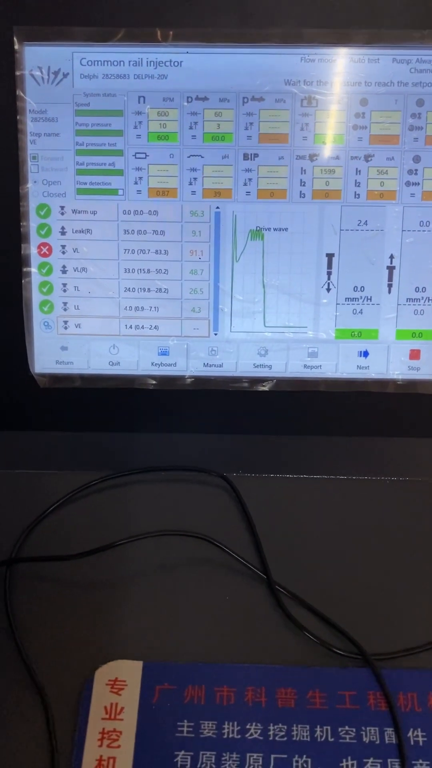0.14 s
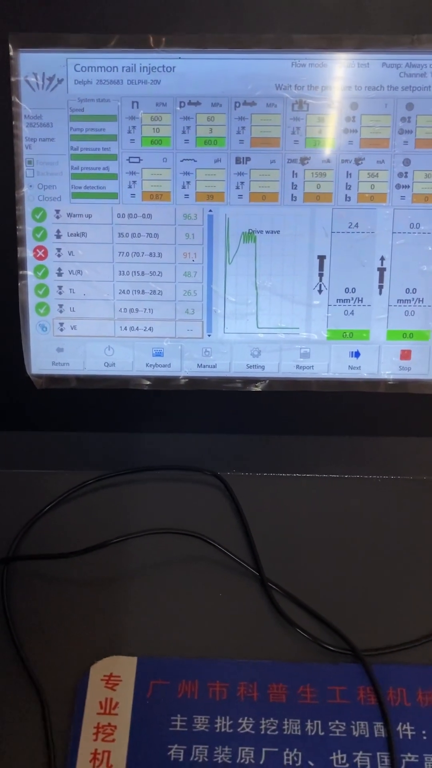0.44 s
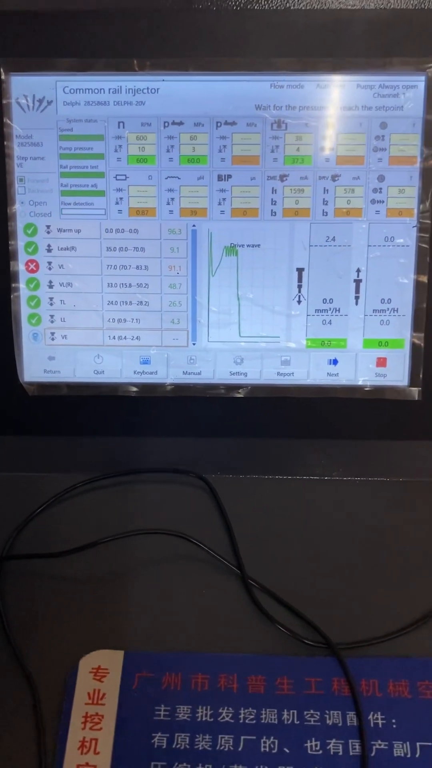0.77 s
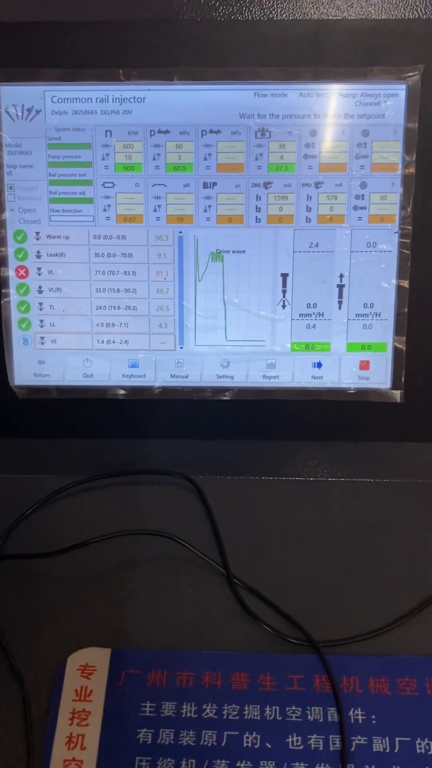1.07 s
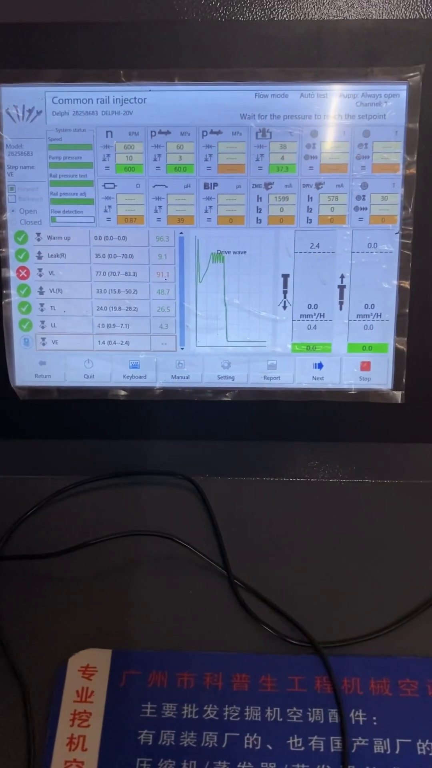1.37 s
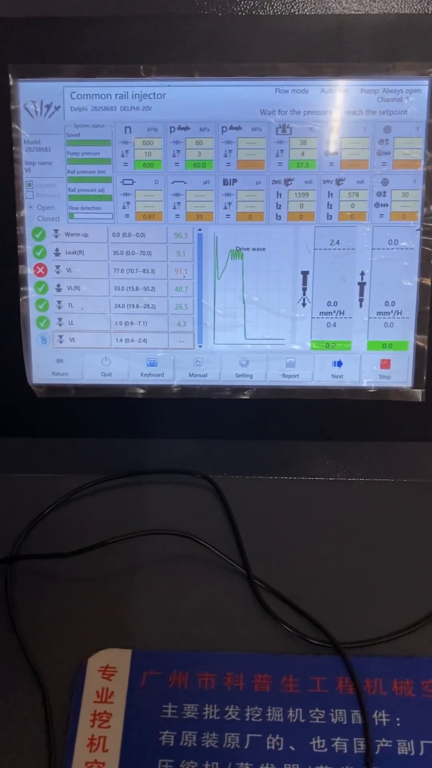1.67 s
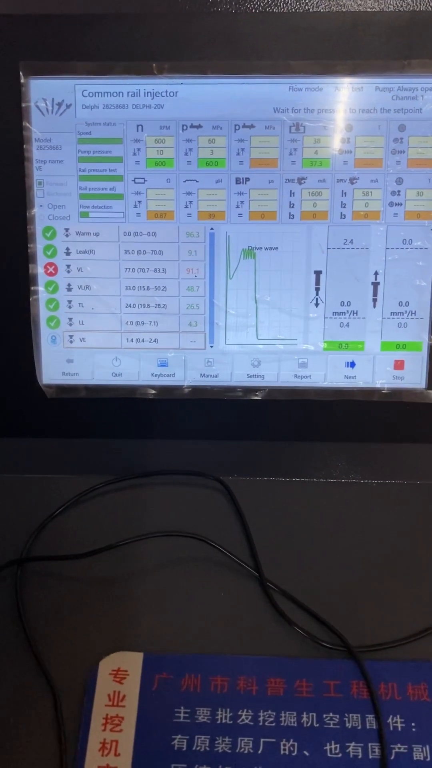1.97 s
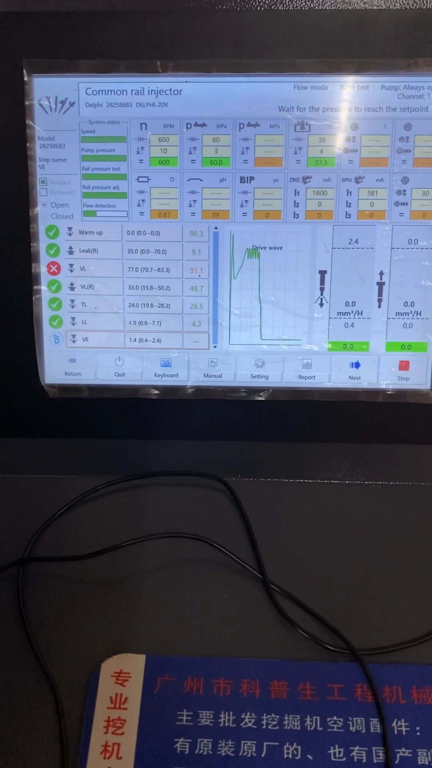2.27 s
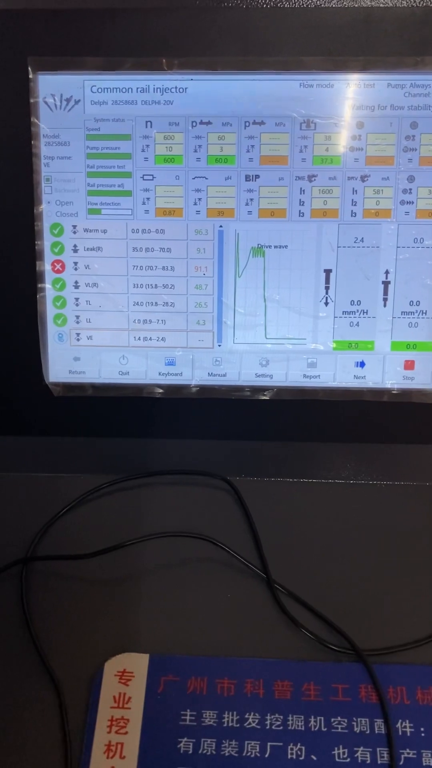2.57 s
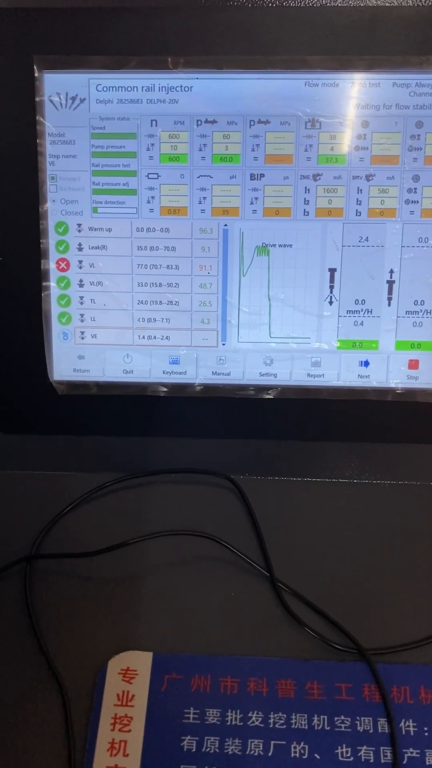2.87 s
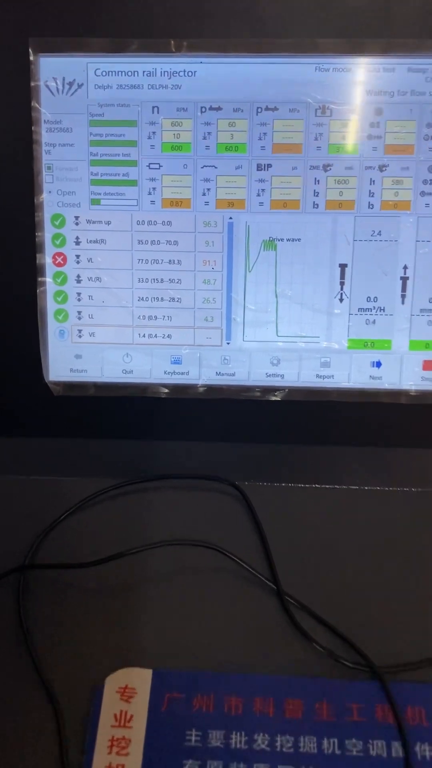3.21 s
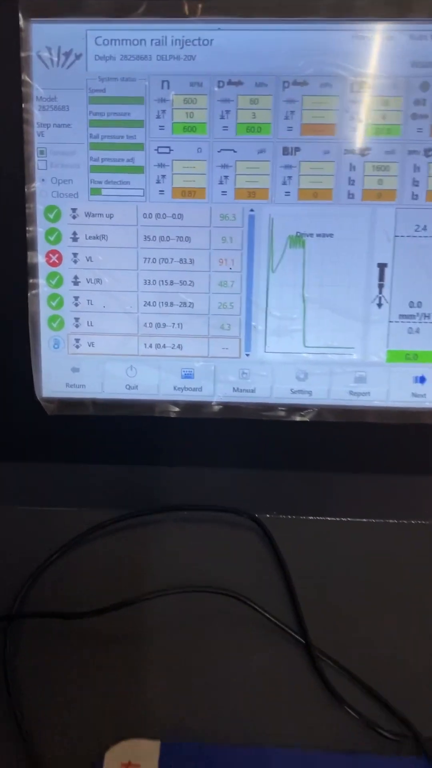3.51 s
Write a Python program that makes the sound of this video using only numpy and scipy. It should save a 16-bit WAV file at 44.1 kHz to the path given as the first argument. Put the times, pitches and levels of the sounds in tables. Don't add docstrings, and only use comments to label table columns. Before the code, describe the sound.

A high-pressure pump on a workshop test bench hums loudly and steadily with a fast flutter.

```python
import sys
import numpy as np
from scipy import signal
from scipy.fft import rfft, irfft, next_fast_len
from scipy.io import wavfile
from scipy.ndimage import uniform_filter1d, map_coordinates

SR = 44100
rng = np.random.default_rng(int(sys.argv[2]) if len(sys.argv) > 2 else 0)


def magnitude_from_level(level_db):
    exponent = np.asarray(level_db, float) / 20
    return 10 ** exponent


def output_pcm(signal):
    pcm = np.clip(np.atleast_2d(signal).T, -1, 1) * 32767
    wavfile.write(sys.argv[1], SR, np.round(pcm).astype(np.int16))


N = 160965
STROKE_HZ = 70.03


def pump_strokes():
    drift_us, jitter_us = 15, 1.2
    late_s = 1e-6 * (drift_us * wobble(0.894) + jitter_us * wobble(24.4))
    return STROKE_HZ * (np.arange(N) / SR - late_s) - 0.5


# order, peak_db, left_over_right_db
PUMP_ORDERS = [(2, -35.5, 1.5), (2.98, -24.5, 6.5), (4.13, -22.5, 4), (4.93, -45.5, 7), (6.05, -57, -5),
               (8.1, -45.5, 3), (9, -43.5, 2.5), (10, -28.5, 4.5), (11, -25.5, 0), (12, -36.5, 6.5),
               (13, -52.5, -1.5), (14, -42, 0.5), (15, -39.5, 3.5), (15.9, -42.5, 7.5), (17, -47.5, 10),
               (18, -48, 2.5), (18.88, -33.5, 3.5), (20.29, -39.5, 6.5), (21., -50, 8), (21.7, -51.5, 4),
               (23, -55.5, 18), (24, -43, -3), (25, -51.5, 9), (29, -56, -12), (35, -48, 2),
               (53, -47.5, -12.5), (55, -44, 5), (56, -58.5, -2), (57, -50.5, -4), (73.8, -47.5, -5)]
# frequency_hz, delay_strokes
CASING_DELAY = [(245, 0.716), (500, 0.4016), (750, 0.2403), (1300, .15)]


def pump_hum(turns):
    scatter_rad, scatter_from_hz = 1.155, 740
    order, peak_db, pan_db = np.transpose(PUMP_ORDERS)
    order = np.round(order).astype(int)
    hz = np.arange(80) * STROKE_HZ
    lag = 2 * np.pi * np.cumsum(along(CASING_DELAY, abs(hz - STROKE_HZ / 2)))
    lag = lag - lag[3]
    lag = lag + scatter_rad * (hz > scatter_from_hz) * rng.standard_normal(len(hz))
    spectrum = np.zeros((2, len(hz)), complex)
    spectrum[:, order] = magnitude_from_level(peak_db) * ports(hz[order], pan_db) * np.exp(-1j * lag[order])
    return play(spectrum, turns)


# frequency_hz, order_peak_db
CASING_LOW = [(1800, -59), (2750, -59), (3150, -72), (3550, -64), (3950, -54), (4300, -61), (5050, -57),
              (5590, -80)]
CASING_HIGH = [(5650, -85), (5950, -63), (6550, -72), (7000, -59), (7800, -65), (9450, -53), (11500, -59),
               (13500, -65),
               (15100, -52), (15800, -58)]
# frequency_hz, t60_s
CASING_T60 = [(2000, 0.15), (5000, 0.12), (9000, 0.073), (15000, 0.017)]


def casing_ring(turns):
    sway_rad, sway_rate_hz = 0.74, 0.8
    hz = np.arange(226) * STROKE_HZ
    t = np.arange(2048) / SR
    size = magnitude_from_level(along(CASING_LOW, hz, True)) + magnitude_from_level(along(CASING_HIGH, hz, True))
    fade = magnitude_from_level(-60 * t / along(CASING_T60, hz)[:, None])
    wave = fade * np.exp(-2j * np.pi * hz[:, None] * t)
    wave = wave / np.linalg.norm(fade, axis=1)[:, None]
    noises = rng.standard_normal((2, 3, len(t)))
    ring_a, ring_b = (play(size * shared(noise @ wave.T, hz), turns) for noise in noises)
    sway = sway_rad * wobble(sway_rate_hz)
    return np.cos(sway) * ring_a + np.sin(sway) * ring_b


SHAFT_HZ, SHAFT_START_S = 5.517, 0.1535
# shaft_order, peak_db
MESH_ORDERS = [(30, -44), (36, -43), (38, -33), (39, -48), (40, -19.5), (41, -45.5), (42, -39), (43, -51),
               (46, -35), (48, -36), (50, -51), (60, -43.5)]


def gear_mesh():
    pan_db, wobble_db = 5.5, 0.5
    order, peak_db = np.transpose(MESH_ORDERS)
    spectrum = np.zeros((2, 70), complex)
    spectrum[:, np.round(order).astype(int)] = magnitude_from_level(peak_db) * ports(order * SHAFT_HZ, pan_db)
    turns = SHAFT_HZ * (np.arange(N) / SR - SHAFT_START_S)
    return magnitude_from_level(wobble_db * wobble(2.96)) * play(spectrum, turns)


def shaft_tick():
    ring_hz, t60_s, rise_s, lead_s = 2168, 0.11, 0.008, 0.005
    level_db, scatter_db, pan_db = -35, 2, -5
    t = np.arange(N) / SR - SHAFT_START_S + lead_s
    turn, part = np.divmod(t * SHAFT_HZ + 1, 1)
    since_s = part / SHAFT_HZ
    luck = rng.standard_normal((30, 2))[turn.astype(int)].T
    decay = magnitude_from_level(level_db + scatter_db * luck[0] - 60 * since_s / t60_s)
    shape = decay * (1 - np.exp(-since_s / rise_s))
    ring = np.exp(1j * (2 * np.pi * ring_hz * since_s + 3 * luck[1]))
    return shape * (ports(np.array([ring_hz]), pan_db) * ring).real


# frequency_hz, density_db_per_hz
RUMBLE_DENSITY = [(20, -82), (50, -64), (140, -65), (230, -57), (325, -58), (450, -67), (800, -68),
                  (950, -76)]
BODY_DENSITY = [(960, -77), (1400, -78), (1850, -83), (2500, -84), (3150, -93), (3850, -83), (5100, -85),
                (5600, -98)]
FIZZ_DENSITY = [(5650, -98), (5950, -91), (6500, -94), (7000, -89), (9500, -86), (11500, -86), (13200, -91),
                (15200, -83)]


def flow_noise(turns):
    pulse_db, decay_strokes = 0.5, 0.32
    burst = magnitude_from_level(pulse_db * np.exp(-(turns % 1) / decay_strokes))
    burst = burst / np.sqrt(np.mean(burst ** 2))
    fizz = burst * rush(FIZZ_DENSITY + [(15800, -77)])
    return rush(RUMBLE_DENSITY) + np.sqrt(burst) * rush(BODY_DENSITY) + fizz


def rush(density):
    patchy_db = 2.5
    m = next_fast_len(N + 8192)
    z = signal.stft(rng.standard_normal((3, m)), nperseg=512)[2]
    field = uniform_filter1d(rng.standard_normal(z.shape[1:]), size=6, axis=0)
    field = uniform_filter1d(field, size=12, axis=1)
    patchy = signal.istft(z * magnitude_from_level(patchy_db * field / field.std()), nperseg=512)[1]
    hz = np.fft.rfftfreq(m, 1 / SR)
    gain = magnitude_from_level(along(density, hz, True)) * np.sqrt(SR / 2)
    return irfft(shared(rfft(patchy, m), hz) * gain, m)[:, :N]


# frequency_hz, left_lead_rad
LEAD_LOW_BAND = [(140, 0), (220, 0.5), (290, 0.86), (500, 2.5), (750, 3), (1330, 4), (1450, 4.5), (1800, 7)]
LEAD_HIGH_BAND = [(1801, 6.2), (2300, 4.49), (3550, 3.64), (3712, 5.9), (3850, 4.14), (4050, 3.38),
                  (5550, 3.33), (5650, 4),
                  (7000, 7.3), (11500, 8.85), (12600, 9.42)]


def ports(hz, pan_db):
    low = along(LEAD_LOW_BAND, hz)
    high = along(LEAD_HIGH_BAND, hz)
    lead = np.where(hz < LEAD_LOW_BAND[-1][0], low, high)
    half = np.array([[.5], [-.5]])
    return magnitude_from_level(half * pan_db) * np.exp(1j * half * lead)


# frequency_hz, left_over_right_db
PORT_BALANCE = [(100, 0), (220, 5.5), (330, 2.5), (450, .5), (1300, 3), (2200, -1), (4000, 0)]
# frequency_hz, common_power_share
PORT_LIKENESS = [(100, .985), (450, .8), (800, .75), (2700, .75), (3300, .92), (5300, .9), (5700, 1),
                 (9000, .92)]


def shared(three, hz):
    alike = np.clip(along(PORT_LIKENESS + [(12700, 1)], hz), 0, 1)
    mixed = np.sqrt(alike) * three[0] + np.sqrt(1 - alike) * three[1:]
    return mixed * ports(hz, along(PORT_BALANCE, hz))


# time_s, turned_share
TURN_AWAY = [
    (0, 0),
    (1.6, 0),
    (2, .12),
    (3.1, .15),
    (3.3, .5),
    (3.5, 1),
    (3.65, 1),
]
# frequency_hz, gain_db
TURNED_GAIN = [(400, 0), (770, 1), (1330, -4), (1680, 3), (2300, -4), (3820, -6), (4000, 6), (4300, 0)]
# frequency_hz, left_lead_rad
TURNED_PHASE = [(400, 0), (600, -.4), (700, 0), (770, -.7), (900, 0), (3800, 0), (4000, 1.8), (4400, .3)]


def phone_motion(ahead):
    settle_s, settle_rad, low_hz, high_hz = 1, 1.4, 4500, 5000
    t = np.arange(N) / SR
    m = next_fast_len(N + 8192)
    hz, half = np.fft.rfftfreq(m, 1 / SR), np.array([[.5j], [-.5j]])
    first = np.exp(half * settle_rad * (hz > low_hz) * (hz < high_hz))
    last = magnitude_from_level(along(TURNED_GAIN, hz)) * np.exp(half * along(TURNED_PHASE, hz) * (hz < high_hz))
    early = np.clip(1 - t / settle_s, 0, 1)
    late = np.clip(np.interp(t, *np.transpose(TURN_AWAY)), 0, 1)
    spectrum = rfft(ahead, m)
    settling = irfft(spectrum * first, m)[:, :N]
    turned = irfft(spectrum * last, m)[:, :N]
    return (1 - early - late) * ahead + early * settling + late * turned


def along(points, hz, closed=False):
    f, v = np.transpose(points)
    outside = dict(left=-200, right=-200) if closed else {}
    return np.interp(np.log(hz + 1), np.log(f + 1), v, **outside)


def wobble(rate_hz):
    knots = rng.standard_normal(int(N * 80 / SR) + 4)
    return map_coordinates(knots, [np.arange(N) * rate_hz / SR])


def play(orders, turns):
    size = 8192
    cycle = irfft(orders, size) * size / 2
    return np.array([map_coordinates(c, [turns % 1 * size], mode="grid-wrap") for c in cycle])


def scene():
    turns = pump_strokes()
    pump = pump_hum(turns) + casing_ring(turns)
    shaft = gear_mesh() + shaft_tick()
    return phone_motion(pump + shaft + flow_noise(turns))


def roll_off(x):
    return signal.sosfilt(signal.butter(12, 15740, fs=SR, output="sos"), x)


def record(dry):
    return roll_off(dry)


dry = scene()
out = record(dry)
output_pcm(out)
```